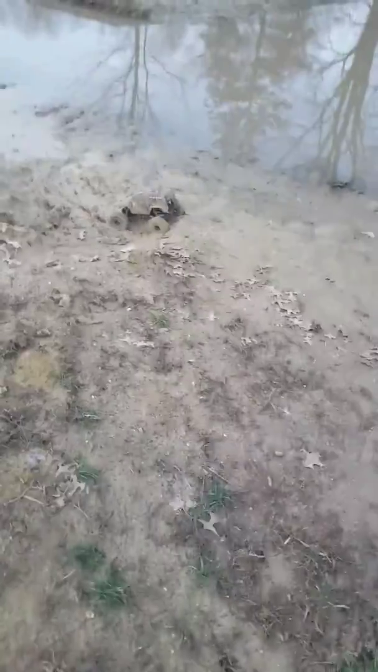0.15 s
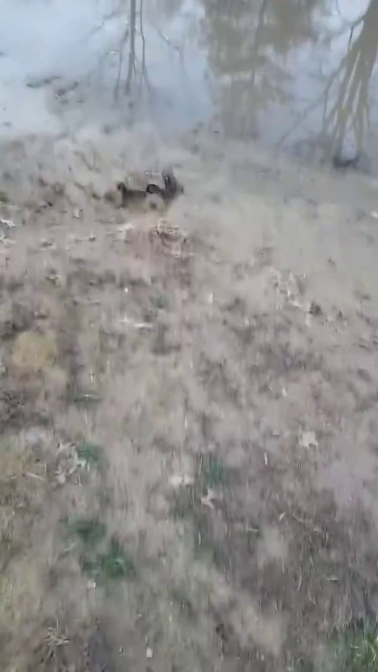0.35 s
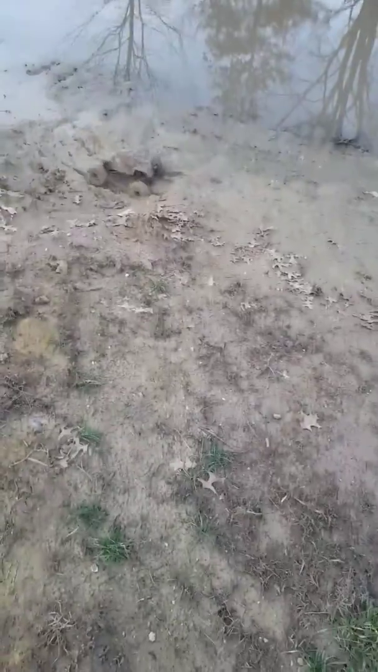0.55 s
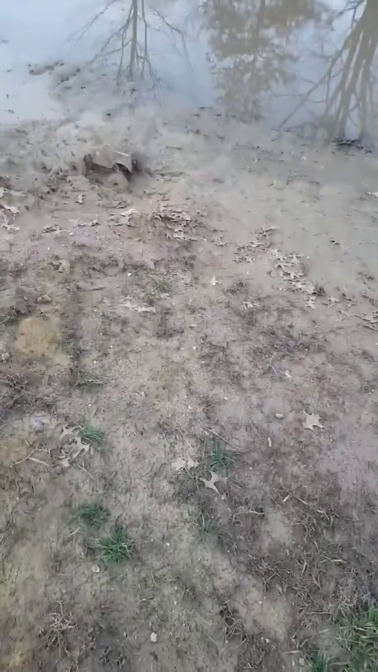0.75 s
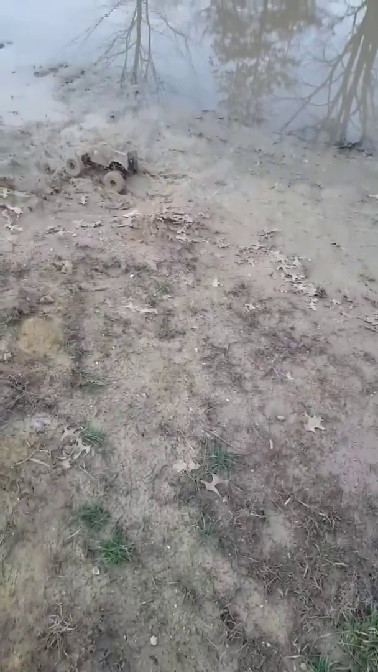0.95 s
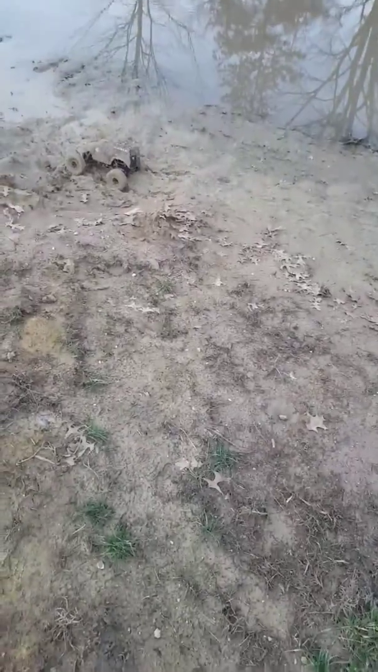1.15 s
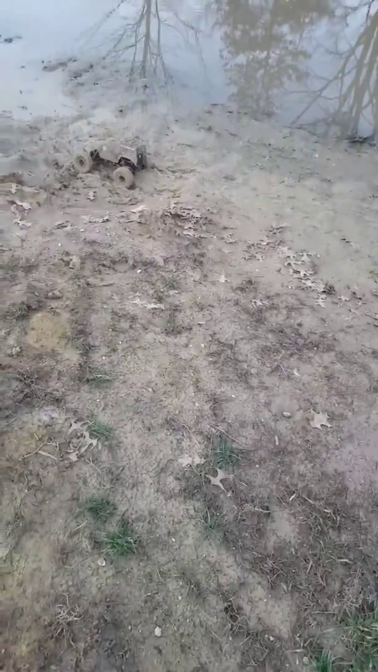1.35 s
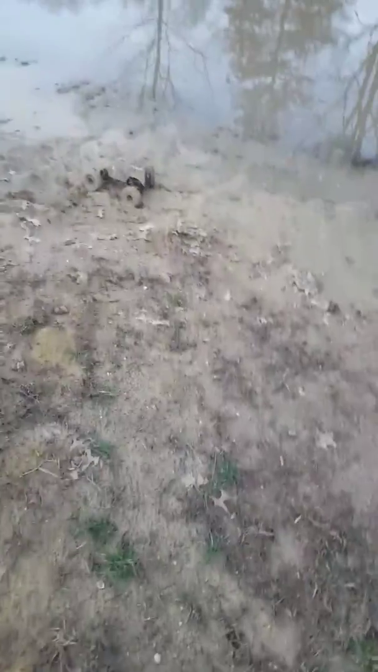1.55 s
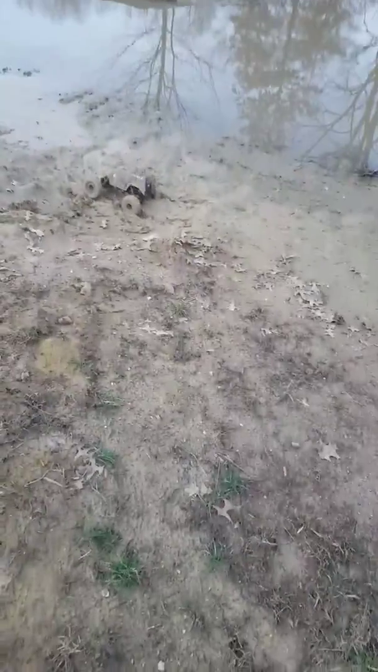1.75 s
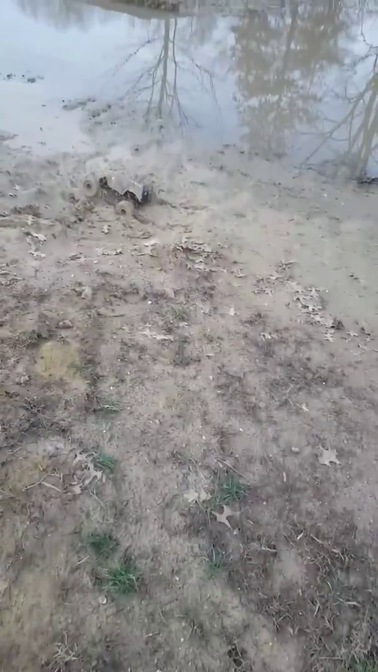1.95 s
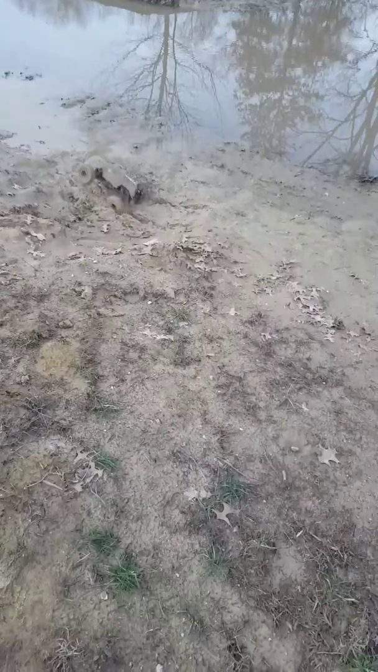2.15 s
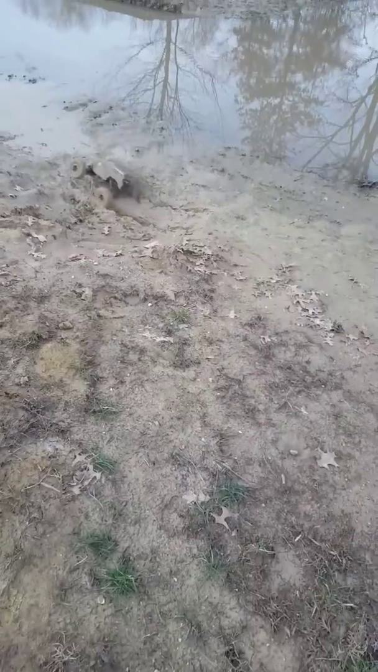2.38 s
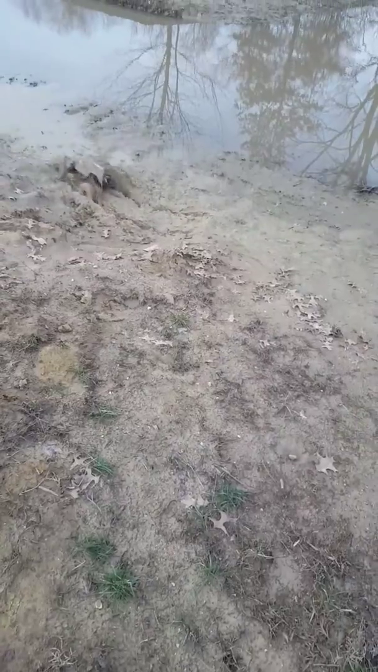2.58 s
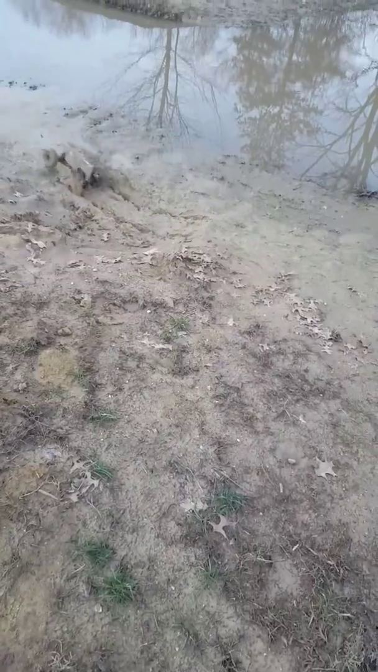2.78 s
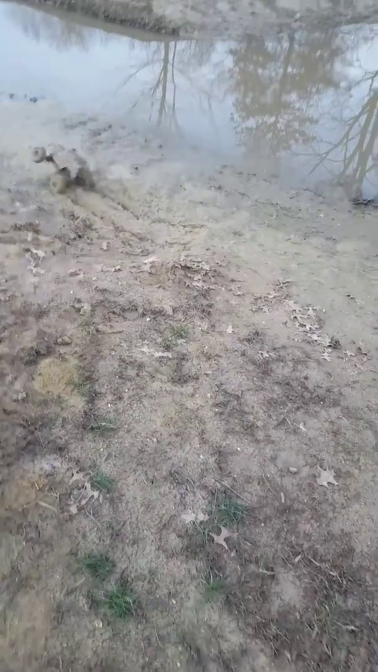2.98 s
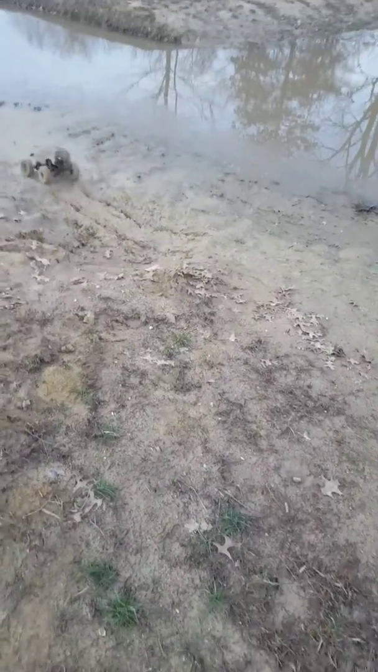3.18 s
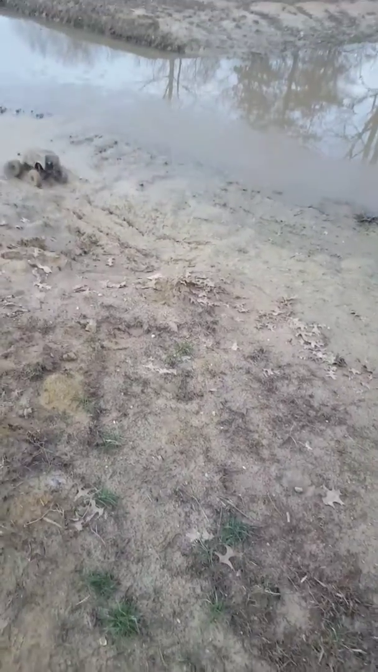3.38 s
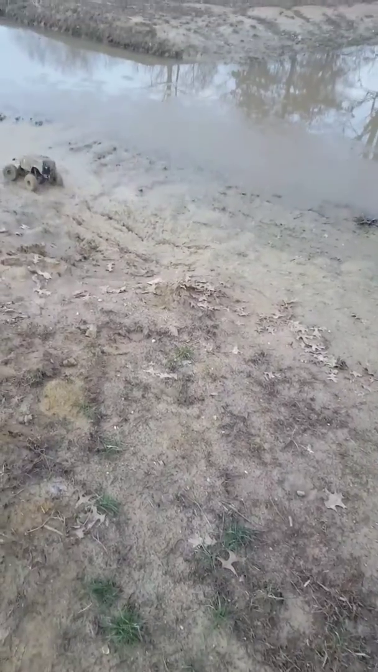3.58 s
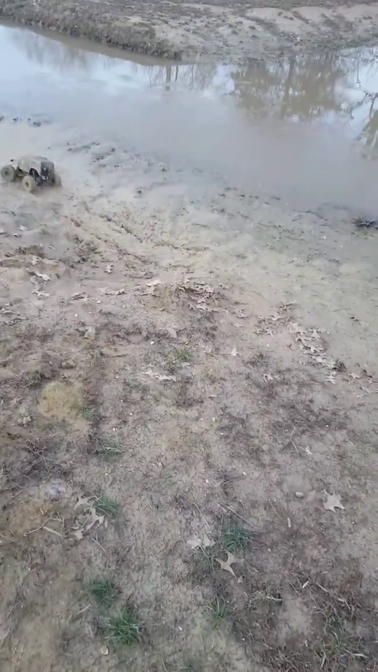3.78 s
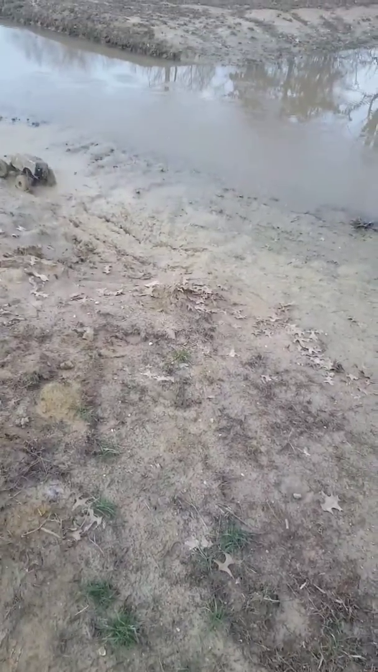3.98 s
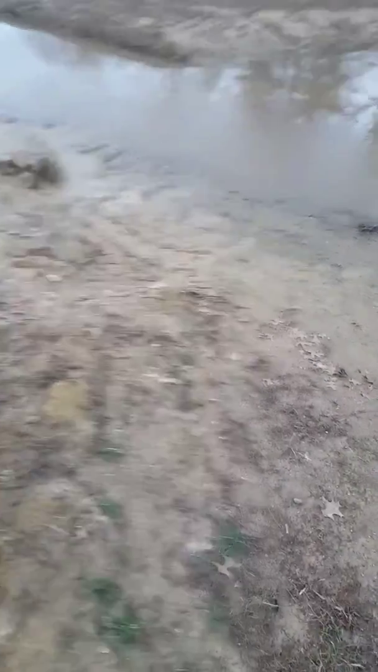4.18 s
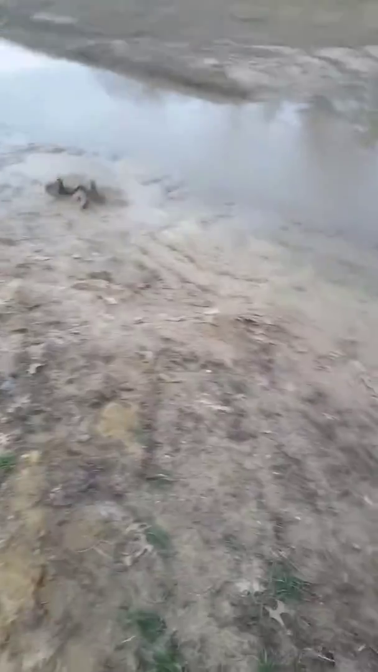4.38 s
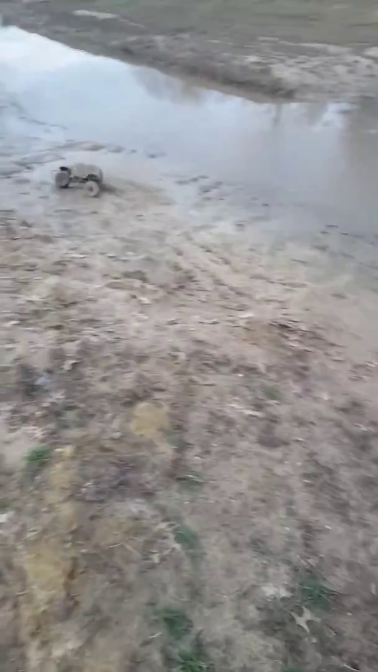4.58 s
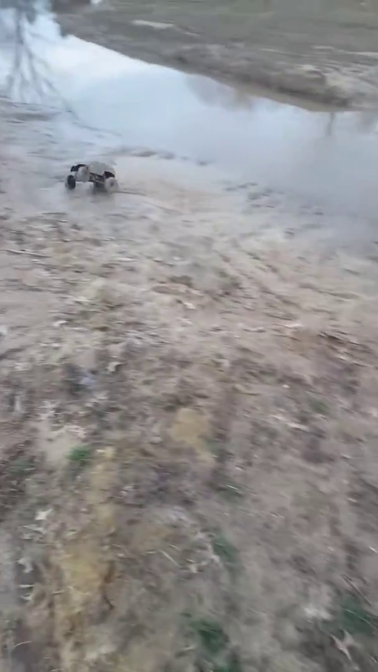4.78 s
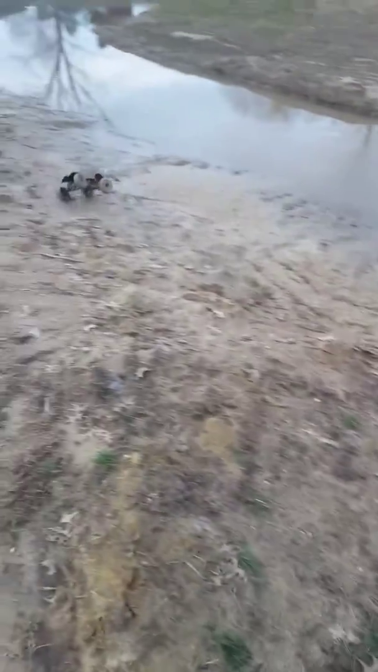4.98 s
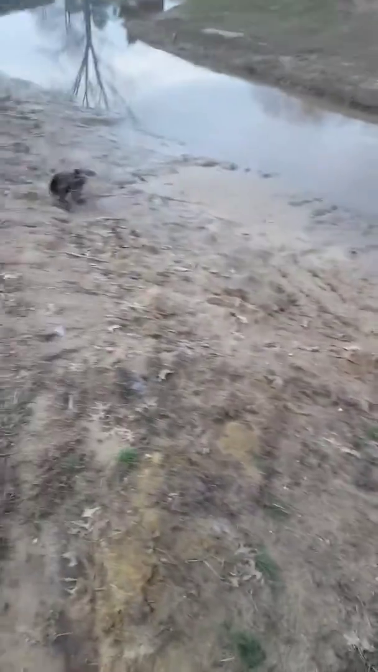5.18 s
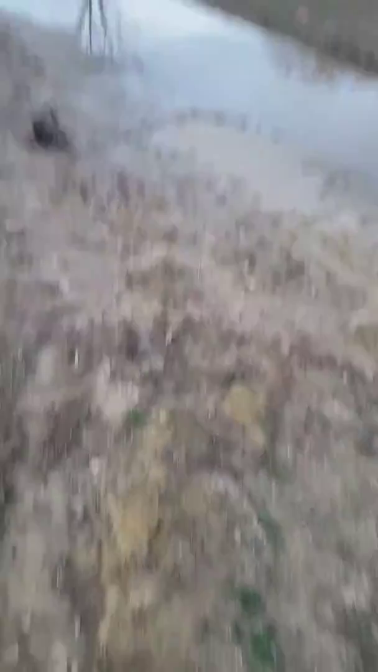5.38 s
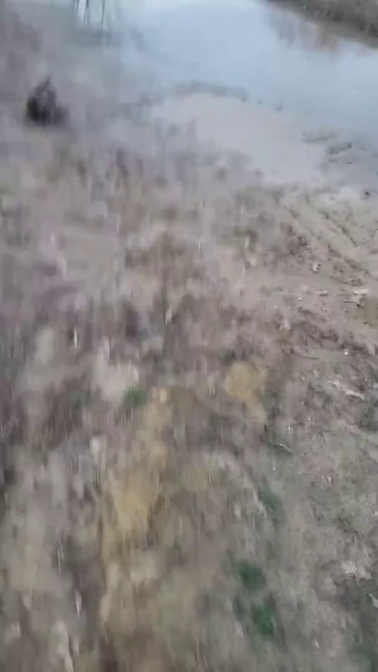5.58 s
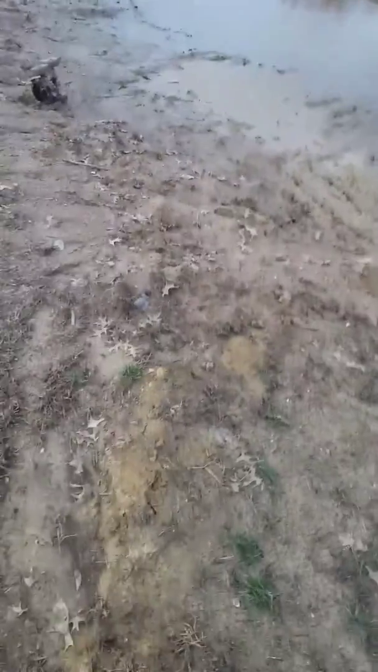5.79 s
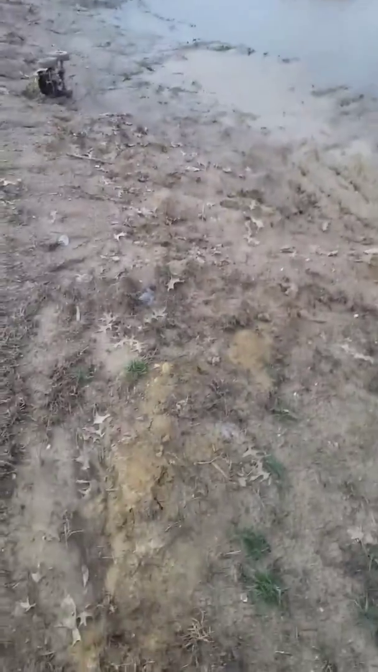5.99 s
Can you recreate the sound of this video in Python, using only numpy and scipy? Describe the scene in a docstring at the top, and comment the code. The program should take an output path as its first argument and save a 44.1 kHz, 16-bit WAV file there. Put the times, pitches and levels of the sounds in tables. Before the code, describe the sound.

Outdoors, a small electric truck snarls through mud in short and longer bursts, with splats, water patter and plops between and after them.

```python
"""At the muddy edge of a pond, in a light breeze, a radio-controlled truck works some metres off, ahead and left.
A first short burst of throttle snatches its gritty gears into a rattle and whine; then mud splats and drops fall.
The second burst is longer, with growls, shell booms and a patter of water; the third throws the most spray.
It bogs down and stops among last plops and bumps. Gears are noise and tones tied to motor speed, water is noise
and damped tones, and a hand-held camera with two resonant microphone ports hears it all."""
import sys
import numpy as np
from scipy import signal
from scipy.fft import rfft, irfft, next_fast_len
from scipy.io import wavfile
from scipy.ndimage import uniform_filter1d

SR = 44100
rng = np.random.default_rng(int(sys.argv[2]) if len(sys.argv) > 2 else 0)


def store_wav(level_fs):
    """Save 16-bit WAV to argv[1]."""
    pcm = np.round(np.clip(np.atleast_2d(level_fs), -1, 1) * 32767)
    wavfile.write(sys.argv[1], SR, pcm.T.astype(np.int16))


N = 266319
T = np.arange(N) / SR
PADDED = next_fast_len(N, True)
HZ = np.fft.rfftfreq(PADDED, 1 / SR)

# Levels in all tables are relative: other gains may act on them. Spectra give the level per Hz of noise.
# motor speed as the pitch of the gear whine, one list a burst of throttle: time_s, pitch_hz
MOTOR_SPEEDS = [
    [(.262, 199.6), (.46, 481), (.55, 980), (.6, 1450), (.63, 1704), (.665, 1890), (.71, 1700),
     (.745, 1250), (.79, 855), (.825, 820), (.852, 950), (.9, 330), (.95, 49)],
    [(1.478, 165), (1.66, 310), (1.69, 444), (1.89, 680), (1.96, 969), (2.005, 1740), (2.04, 1930),
     (2.1, 2146), (2.16, 2135), (2.225, 1788), (2.3, 2290), (2.38, 2576), (2.46, 2387), (2.525, 1738),
     (2.575, 1560), (2.665, 1520), (2.695, 1750), (2.74, 2110), (2.82, 1789), (2.89, 2077), (2.97, 2260),
     (3.03, 1800), (3.1, 1620), (3.15, 1317), (3.21, 630), (3.42, 312), (3.6, 122), (3.78, 60.3)],
    [(3.79, 202.7), (3.9, 476.5), (3.96, 855), (4, 1152), (4.12, 1683), (4.18, 1630), (4.24, 1412),
     (4.29, 1780), (4.355, 1910), (4.39, 1671), (4.44, 1540), (4.48, 1375), (4.55, 1365), (4.65, 1523),
     (4.77, 1659), (4.85, 1521), (4.9, 1899), (4.935, 2061), (4.97, 1830), (5.015, 2123), (5.1, 1788),
     (5.16, 1907), (5.2, 1270), (5.31, 1016), (5.355, 111), (5.6, 39.3)],
]
# how hard each burst works the truck:
# rattle_db, whine_db (against the rattle), mud_db, spray_db, drift_db_per_s (of all four)
BURST_LEVELS = [(-32.5, -3, -39.5, -52, -4), (-32, -7.5, -40.5, -44, -2), (-35, 0.5, -40.5, -27.5, -1)]
# the gears snatch as the tyres grip: start_s, peak_db, decay_s
GEAR_JOLTS = [(0.267, -35, 0.0025), (0.284, -32, 0.0076), (.308, -36, 0.0046), (0.337, -35, 0.0035),
              (.361, -55, 0.003), (0.383, -27.5, 0.0051), (0.417, -28, 0.0031), (0.426, -24.5, 0.0053),
              (.456, -41, 0.0037), (0.472, -32, 0.0084), (0.501, -22.5, 0.013), (0.53, -30.5, 0.03),
              (.55, -27, 0.0065), (.601, -29, 0.0035), (.618, -27, 0.0055), (0.638, -23, 0.0061),
              (.661, -29.5, 0.027), (.776, -21, 0.0056), (0.791, -21, 0.032), (0.824, -28, 0.027),
              (.88, -38, 0.0047), (1.477, -37.5, 0.0011), (1.493, -50, 0.0017), (1.521, -36, 0.0034),
              (1.677, -53, 0.0032), (1.745, -24.5, 0.007), (1.766, -26, 0.0056), (1.793, -25.5, 0.0069),
              (1.818, -32, 0.0037), (1.85, -25, 0.0036), (1.867, -24.5, 0.022), (1.946, -23.5, 0.012),
              (2.004, -28, 0.013), (3.037, -44, 0.0019), (3.154, -25, 0.0048), (3.793, -38, 0.0059),
              (3.841, -32, 0.0041), (3.98, -31, 0.0035), (4.108, -43, 0.0082), (4.263, -29, 0.006),
              (4.683, -22, 0.01), (4.755, -25, 0.12), (4.949, -23, 0.012), (5.187, -49, 0.0026)]
# spectrum of the gear rattle: pitch_hz, level_db
RATTLE_SPECTRUM = [(100, -19), (400, -4.5), (1150, 9.5), (1420, 13), (1750, 7.5), (2600, 0), (4000, 4.5),
                   (5500, -1), (7500, 4.5), (11000, -9.5), (16000, 9)]
# gearbox resonances: pitch_hz, width_hz, level_db
GEARBOX_MODES = [(434, 185, -6), (1651, 123, -4), (2090, 300, -4.5), (3240, 83, -13), (3580, 690, -6)]
# how strongly the gears sing: time_s, level_db
SINGING_LEVEL = [(.6, -9), (.68, 1), (2, -6), (2.05, 4.5), (2.18, 6), (2.27, 1.5), (2.45, -26), (2.54, 9),
                 (2.62, -3), (2.74, 3.5), (2.85, -2.5), (2.98, 5.5), (3.08, -8), (4.1, -0.5), (4.26, -2),
                 (4.33, -7), (4.39, 8.5), (4.46, -3), (4.6, 2), (4.77, -4.5), (4.85, -4), (4.92, -2),
                 (5.03, -6), (5.2, -13)]
# partials of the whine besides the mesh tone: multiple, width_hz, first_db, second_db, third_db (by burst)
WHINE_PARTIALS = [(.245, 30, -21, -15, -18.5), (.48, 40, -24, -15, -21), (.78, 50, -19.5, -13, -26),
                  (1.5, 110, -16, -21, -14), (2, 420, -13, -14, -13), (3, 450, -16, -37, -28),
                  (4.04, 553, -7.5, -10.5, -12)]
# how strongly the spur gear sings under the mesh tone: time_s, level_db
SPUR_LEVEL = [(3.85, -69), (4.13, -51), (4.22, -38), (4.28, -43), (4.38, -37.5), (4.43, -43), (4.48, -29.5),
              (4.53, -28.5), (4.555, -44), (4.6, -32), (4.65, -42), (4.76, -37), (4.85, -40), (4.9, -43),
              (5.05, -51), (5.3, -58)]
# body shell modes, drummed at high speed: pitch_hz, width_hz, level_db, onset_hz (motor speed)
SHELL_MODES = [(810, 103, -37.5, 2156), (1180, 46, -38.5, 2270)]
# squeaks of shell and gearbox: start_s, length_s, pitch_hz, width_hz, level_db, follows (motor pitch, 0-1)
SHELL_SQUEAKS = [(0.29, .12, 1686, 70, -48, 0.01), (0.471, 0.048, 1670, 70, -34.5, 0.1),
                 (.545, 0.0896, 1706, 60, -44, 0), (0.631, 0.075, 7500, 200, -45, 1),
                 (.65, 0.07, 1767, 90, -37, 0.05), (0.774, 0.099, 3370, 400, -40.5, 0.7),
                 (.63, 0.12, 3505, 500, -41, 0), (1.87, 0.026, 1780, 84, -34.5, 0.12),
                 (1.918, 0.048, 3905, 610, -33, 0.2), (2.42, 0.058, 1167, 50, -34, .1),
                 (2.507, 0.041, 3600, 120, -36.5, .2), (2.856, 0.046, 4020, 158.5, -42, .3),
                 (3.865, .04, 1700, 90, -47, .05), (3.925, .06, 3250, 450, -44, .4),
                 (4.455, .05, 1630, 60, -41, .1), (5.34, .1, 1970, 150, -64, 0),
                 (4.483, .1, 2026, 121, -43, 0.2), (4.843, 0.1, 3526, 300, -37.5, 0.4),
                 (5.279, 0.049, 2000, 140, -46, 0.06)]
# the chassis growls as the wheels spin free: start_s, length_s, level_db
CHASSIS_GROWLS = [(0.38, 0.096, -54), (.58, .2, -48), (2.022, 0.19, -42.5), (2.259, 0.091, -35.5),
                  (2.337, 0.17, -41.5), (2.712, 0.095, -42), (2.95, 0.056, -42), (3.04, .1, -52.5),
                  (4.92, 0.27, -50)]
# strands of the growl, pitched for full speed: pitch_hz, width_hz, level_db
GROWL_STRANDS = [(428, 12, -5), (482, 20.6, 1), (549, 16, -4.5)]
# spectrum of churned mud: pitch_hz, level_db
MUD_SPECTRUM = [(60, -25), (200, -1), (320, 0), (440, -1.5), (640, 1.5), (900, 8.5), (1300, 5), (2200, -2),
                (4000, -4), (7000, -18.5), (16000, -22)]
# the tyres shove a wave of wet mud aside: start_s, length_s, level_db
MUD_SLOSHES = [(0.408, 0.075, -45), (0.617, 0.21, -47), (1.27, 0.2, -64.5), (3.525, 0.13, -57),
               (3.779, 0.053, -51.5), (4.612, 0.23, -47.5), (5.395, .13, -60.5)]
# mud splats landing: start_s, peak_db
MUD_SPLATS = [(1.0645, -46), (1.0783, -39), (1.1134, -40.5), (1.161, -50), (1.181, -39.5), (1.2236, -46),
              (3.581, -46), (3.726, -41), (5.4308, -29), (5.4794, -41), (5.493, -44), (5.5235, -51),
              (5.5565, -44), (5.5713, -50)]
# spectrum of fine spray: pitch_hz, level_db
SPRAY_SPECTRUM = [(300, -7.5), (1500, 4), (3500, 1), (5500, -14), (7200, -2.5), (10000, -41), (13000, -5.5),
                  (16000, 9)]
# thrown water patters back on the pond: start_s, length_s, level_db
WATER_SHOWERS = [(1.305, 0.22, -69), (3.156, 0.29, -44.5), (3.4, 0.31, -54.5), (5.32, 0.17, -59)]
# spectrum of the patter: pitch_hz, level_db
PATTER_SPECTRUM = [(300, -14), (1200, 5), (2200, 6.5), (3600, 1), (5500, -8), (7200, -10.5), (15000, -18.5)]
# bubbles and drops in the puddles: start_s, peak_db, pitch_hz, t60_s
PUDDLE_PLOPS = [(.94, -45, 1190, .04), (1.064, -44, 1200, .014), (1.175, -52, 1750, .012),
                (1.238, -52, 2300, .015), (3.025, -31, 1490, .023), (3.027, -33, 2500, .012),
                (3.037, -40, 3870, .034), (3.268, -35, 1960, .015), (3.345, -40, 1450, .06),
                (3.413, -43, 1836, .05), (3.419, -38, 555, .06), (3.528, -43, 1260, .04),
                (3.545, -41, 625, .032), (3.55, -43, 1300, .025), (3.581, -36.5, 1260, .025),
                (3.582, -42, 1600, .015), (3.598, -40, 405, .014), (3.6, -42, 900, .012),
                (3.626, -45, 1050, .02), (3.665, -50, 820, .04), (3.698, -51, 780, .03),
                (3.718, -49, 870, .025), (3.733, -46, 1280, .012), (3.757, -50, 760, .02),
                (5.34, -35, 4270, .016), (5.341, -42, 1500, .015), (5.44, -47, 1200, .02),
                (5.514, -50, 780, .02), (5.5235, -32, 3400, .0035), (5.534, -48, 2850, .008),
                (5.5565, -33, 1900, .0014), (5.583, -52, 520, .02), (5.63, -53, 1450, .012),
                (5.657, -45.5, 1320, .007), (5.687, -53, 1220, .006), (5.716, -44.5, 1040, .007),
                (5.838, -55, 850, .015), (5.986, -43, 850, .003)]
# strength of the breeze on the ports: time_s, level_db
GUST_LEVEL = [(0, -57.5), (.75, -54), (1.1, -53.5), (1.24, -61.5), (1.4, -58), (1.51, -43.5), (2.03, -50.5),
              (2.9, -50), (3.06, -61), (3.25, -49), (3.72, -58), (3.95, -55), (5.1, -52.5), (5.4, -53.5),
              (5.65, -63), (6.04, -60.5)]
# spectrum of wind on the ports: pitch_hz, level_db
WIND_SPECTRUM = [(15, -62), (28, -28), (40, -8), (75, 1.5), (115, -2.5), (180, -8), (300, -21), (700, -51),
                 (3000, -81)]
# the hand shifts on the camera with a low rumble: start_s, length_s, pitch_hz, width_hz, level_db
HAND_RUBS = [(1.472, 0.22, 113, 99, -43), (1.779, 0.14, 103, 68.6, -39), (3.215, 0.41, 77.5, 55, -48)]
# soft bumps on the camera: start_s, peak_db, pitch_hz, t60_s
HAND_BUMPS = [(.235, -47, 88, 0.033), (1.6, -34, 184, 0.15), (3.286, -34, 92, 0.03), (5.735, -50, 75, .05),
              (5.758, -44.5, 186, 0.018), (5.958, -43, 115, 0.03)]
# spectrum of still outdoor air: pitch_hz, level_db
AIR_SPECTRUM = [(30, 15), (200, 6), (400, 6.5), (1000, 5.5), (1700, 0), (3000, -7.5), (6000, -15),
                (16000, -17.5)]
# response of the microphone ports: pitch_hz, left_db, right_db
PORT_RESPONSE = [(100, -4.5, -1), (530, -3.5, -3.5), (1044, -9.5, -8.5), (2263, -1, 4), (3490, -2.5, -1.5),
                 (4300, 1, -5.5), (4800, 0.5, 1.5), (6590, 10.5, -1.5), (7050, 18.5, 11), (7924, 9.5, 10.5),
                 (8750, -12.5, -6.5), (11370, 0, -1.5), (11200, 4.5, 5.5), (16100, -3, -4.5)]
# the truck between the ports: pitch_hz, left_lead_rad, likeness (0-1)
PORT_DIFFERENCE = [(145, -0.5, 0.89), (370, 1.5, 1), (690, 0.52, 0.96), (1040, 1.05, 1), (1570, 1.57, 0.95),
                   (1950, 1.45, 0.9), (2334, 3.5, 0.91), (2495, 3, 0.92), (3100, 4.5, 0), (4000, 6, 0.6),
                   (4600, 5, 0.5), (5420, 9.5, 0.53), (7120, 13, 0.65), (7940, 14, 0.25), (9740, 15, 0),
                   (14200, 21.5, .2)]


def truck(rattle_db=-1, ring_db=4.0, quieter_at_speed_db=12.0, coast_db=-4, jolt_db=-12, load_db=1.0,
          rough_db=1.5, uneven_db=.5, sing_wander_db=1, stall_hz=800, sing_from_hz=1426, sing_to_hz=2280,
          grit=0.51, flutter=0.01667, power=1.23):
    """Gritty teeth rattle and ring the gearbox, louder with speed and load; the whine rides on motor speed."""
    speed = motor_speed()
    winding_up = np.clip(uniform_filter1d(np.gradient(np.log(speed)) * SR, size=2000) / 4, 0, 1)
    # near stall the motor judders; at speed only a fine roughness is left
    stalled = 1 / (1 + (speed / stall_hz) ** 3)
    shake = amp(stalled * cogging() + rough_db * wander(130) + uneven_db * wander(22))
    jolts = sum(blows([(s, db)], rise=0.0025, decay=decay) for s, db, decay in GEAR_JOLTS)
    force = effort(power, axis=0) * amp(load_db * winding_up) * shake + amp(jolt_db) * jolts

    teeth = unit(noise() + grit * grains(per_s=1100)) * shaft_beat(speed)
    rattle = amp(rattle_db) * colour(teeth, RATTLE_SPECTRUM)
    # a slow, labouring motor knocks the box; a fast one sings instead
    box = sum(amp(db) * resonate(teeth, hz, width) for hz, width, db in GEARBOX_MODES)
    box = box * amp(ring_db - quieter_at_speed_db * (1.5 - stalled) + coast_db * coasting(speed))

    # backlash makes the mesh frequency flutter
    mesh_hz = speed * (1 + flutter * wander(75.9))
    in_range = 1 / (1 + (sing_from_hz / speed) ** 6 + (speed / sing_to_hz) ** 40)
    singing = in_range * amp(curve(SINGING_LEVEL) + sing_wander_db * wander(21))
    whine = effort(0, axis=1) * singing * gear_tone(mesh_hz)
    return force * (rattle + box + whine + overtones(mesh_hz))


def motor_speed():
    """The gear whine's pitch in Hz at every sample, joined up across the bursts."""
    return curve(sum(MOTOR_SPEEDS, []))


def effort(power, axis, cruise_hz=1800):
    """Gain growing as a power of motor speed, scaled by one BURST_LEVELS column; zero away from bursts."""
    running = np.zeros(N)
    for rows, levels in zip(MOTOR_SPEEDS, BURST_LEVELS):
        start, end = rows[0][0], rows[-1][0]
        drift_db = levels[-1] * (T - (start + end) / 2)
        running += amp(levels[axis] + drift_db) * (T > start) * (T < end)
    return uniform_filter1d(running, size=300) * (motor_speed() / cruise_hz) ** power


def cogging(knock_hz=48, jitter=0.2, knock_share=0.26, knock_db=8.5, judder_db=2.8):
    """Level in dB of a motor near stall: it catches and knocks at an uneven rate."""
    turns = np.cumsum(knock_hz * (1 + jitter * wander(25))) / SR
    knocks = np.exp(-(turns % 1) / knock_share) - knock_share
    return knock_db * knocks + judder_db * wander(90)


def coasting(speed):
    """0 while the motor pulls, towards 1 while it runs down."""
    return np.clip(-uniform_filter1d(np.gradient(np.log(speed)) * SR, size=8000) / 3, 0, 1)


def shaft_beat(mesh_hz, gear_ratio=4.4, beat_db=-0.5, jitter=0.039):
    """Mud on the gears makes the rattle throb once a turn, unevenly."""
    turns = np.cumsum(mesh_hz / gear_ratio * (1 + jitter * wander(48.0))) / SR
    return unit(amp(beat_db * np.cos(2 * np.pi * turns)))


def gear_tone(mesh_hz):
    """The mesh tone: a firm core in a rough band, wavering as the teeth meet unevenly."""
    tone = rasp(mesh_hz, 35, firmness=1) + amp(-6) * rasp(mesh_hz, 200)
    waver_db = 2.4 * np.tanh(wander(110))
    return unit(tone * amp(waver_db))


def overtones(mesh_hz, from_hz=800, housing_hz=3850, housing_width_hz=600, housing_db=5, level_db=-3.5,
              fade_hz=7800):
    """Other gears join in as the motor speeds up, high ones in fits, flaring at the housing's resonance."""
    out = np.zeros((2, N))
    burst = np.searchsorted([rows[0][0] for rows in MOTOR_SPEEDS[1:]], T)
    for multiple, width, *burst_dbs in WHINE_PARTIALS:
        hz = multiple * mesh_hz
        flare_db = housing_db / (1 + ((hz - housing_hz) / housing_width_hz) ** 2)
        # the low partials are steadier than the high ones
        fits_db = min(2 + 3 * multiple, 5.5) * np.tanh(wander(45))
        gain = amp(level_db + np.array(burst_dbs)[burst] + flare_db + fits_db)
        out += gain * rasp(hz, width) / (1 + (hz / fade_hz) ** 8)
    return out / (1 + (from_hz / mesh_hz) ** 4)


def spur(ratio=.66, width_hz=95, waver_db=3):
    """The spur gear sings roughly, a fifth below the mesh tone, as the truck pulls through the last stretch."""
    pulling = (T > SPUR_LEVEL[0][0]) * (T < SPUR_LEVEL[-1][0])
    level = amp(curve(SPUR_LEVEL) + waver_db * np.tanh(wander(60))) * pulling
    return level * rasp(ratio * motor_speed(), width_hz, firmness=.25)


def shell(bend=0.37, top_hz=2350, steepness=22):
    """The loose body shell booms when the wheels spin hard and squeaks, its pitch pulled by the motor."""
    speed, out = motor_speed(), np.zeros((2, N))
    for hz, width, db, onset_hz in SHELL_MODES:
        drummed = 1 / (1 + (onset_hz / speed) ** steepness)
        out += amp(db) * drummed * resonate(noise(), hz * (speed / top_hz) ** bend, width)
    for start, length, hz, width, db, follows in SHELL_SQUEAKS:
        middle_speed = np.interp(start + length / 2, T, speed)
        pull = (speed / middle_speed) ** follows
        out += amp(db) * arch(start, length) * rasp(hz * pull, width)
    return out


def growl(top_hz=2330, bend=0.45):
    """Unbalanced muddy shafts shake the chassis in surges; the strands slide with the motor."""
    pull = (motor_speed() / top_hz) ** bend
    strands = sum(amp(db) * rasp(hz * pull, width, firmness=0.97) for hz, width, db in GROWL_STRANDS)
    return strands * sum(amp(db) * arch(s, length) for s, length, db in CHASSIS_GROWLS)


def mud(churn_db=1, lumps=0.35, patchy_db=2.5, splat_db=-9):
    """Tyres tear wet clods loose; some land as short splats."""
    wet = colour(noise() + lumps * grains(per_s=560), MUD_SPECTRUM)
    churn = churning() * amp(churn_db + patchy_db * wander(44)) * wet
    landing = amp(splat_db) * blows(MUD_SPLATS, rise=0.00021, decay=0.0011) + clods()
    # splat spectrum: pitch_hz, level_db
    splat = colour(noise(), [(500, -16.0), (3500, 13.5), (7000, 6), (15000, 6.0)])
    return churn + landing * splat


def churning(power=0.91, settle_s=0.12, settle_share=0.086, seep_db=-69):
    """How much the mud moves: it follows the wheels, sloshes, settles slowly and never quite stops seeping."""
    stirred = effort(power, axis=2)
    sloshes = sum(amp(db) * arch(s, length) for s, length, db in MUD_SLOSHES)
    settling = linger(stirred, settle_s)
    return (1 - settle_share) * stirred + settle_share * settling + sloshes + amp(seep_db)


def clods(per_s=45, clod_db=-2, range_db=16, airborne_s=0.081, decay_s=0.0019):
    """Envelope of small clods that the tyres fling up and that keep landing after the wheels slow."""
    size = amp(clod_db - range_db * rng.random(N)) * linger(effort(1, axis=2), airborne_s)
    landings = size * (rng.random(N) < per_s / SR)
    return signal.lfilter([1], [1, -np.exp(-1 / (decay_s * SR))], landings)


def gurgle(count=260, bubble_db=1, range_db=16, low_hz=400, high_hz=2600, ring_cycles=32):
    """Small bubbles burst in the wet mud, as loud as the churning that frees them."""
    when, size, pitch = rng.random((count, 3)).T
    s, hz = when * T[-1], low_hz * (high_hz / low_hz) ** pitch
    churn_db = 20 * np.log10(np.interp(s, T, abs(churning())))
    db = churn_db + bubble_db - range_db * size
    return plops(zip(s, db, hz, ring_cycles / hz), glide=0.3, cycles=15.0)


def spray(spray_db=-3, drops=0.55, power=1.37):
    """Droplets fly off the tyres, the more the faster they spin."""
    droplets = colour(noise() + drops * grains(per_s=810), SPRAY_SPECTRUM)
    return amp(spray_db) * effort(power, axis=3) * droplets


def patter(drops=0.79):
    """Sheets of thrown water come down as many small drops."""
    falling = sum(amp(db) * arch(s, length) for s, length, db in WATER_SHOWERS)
    return falling * colour(noise() + drops * grains(per_s=600), PATTER_SPECTRUM)


def plops(rows, glide, cycles):
    """Damped tones that swell over a few cycles; a bubble's pitch climbs (glide) as it nears the surface."""
    t, out = T[:SR // 5], np.zeros((2, N))
    for s, db, hz, t60 in rows:
        turns = hz * (t + glide * t ** 2 / (2 * t60))
        shape = (1 - np.exp(-t * hz / cycles)) * amp(-60 * t / t60)
        add(out, s, amp(db) * shape / shape.max() * np.sin(2 * np.pi * turns))
    return out


def breeze(lumpy_db=3.0, shared=0.85, left_db=2.5):
    """Lumpy eddies, only partly shared by the two ports, and the rubs and bumps of the hand."""
    eddies = colour(noise() + shared * rng.standard_normal(N), WIND_SPECTRUM)
    eddies = eddies * amp([[left_db], [-left_db]])
    gusts = amp(curve(GUST_LEVEL) + lumpy_db * wander(30.0))
    rubs = sum(amp(db) * arch(s, length) * resonate(noise(), hz, width)
               for s, length, hz, width, db in HAND_RUBS)
    return gusts * eddies + rubs + plops(HAND_BUMPS, glide=0, cycles=1.0)


def still_air(level_db=-62.5):
    """Steady outdoor air: coloured noise, unrelated at the two ports."""
    return amp(level_db) * colour(noise(), AIR_SPECTRUM)


def amp(db):
    """Gain for a level in dB."""
    return 10 ** (np.asarray(db) / 20)


def unit(x):
    """Scales to rms 1."""
    return x / np.sqrt(np.mean(x ** 2) + 1e-20)


def curve(rows, axis=1):
    """One column of a time table, at every sample."""
    rows = np.array(rows)
    return np.interp(T, rows[:, 0], rows[:, axis])


def spectrum(rows, axis=1):
    """One column of a frequency table, at every bin."""
    rows = np.array(rows)
    return np.interp(np.log(HZ + 1), np.log(rows[:, 0] + 1), rows[:, axis])


def filtered(x, gain):
    """Applies one gain for each frequency bin."""
    return irfft(rfft(x, PADDED) * gain, PADDED)[..., :N]


def colour(x, rows):
    """Filters by a spectrum, to rms 1."""
    return unit(filtered(x, amp(spectrum(rows))))


def noise():
    """Two unrelated white noises."""
    return rng.standard_normal((2, N))


def wander(hz):
    """Slow chance of rms 1, up to about hz."""
    return unit(filtered(rng.standard_normal(N), 1 / (1 + (HZ / hz) ** 4)))


def grains(per_s):
    """Random clicks of uneven size."""
    return unit((rng.random(N) < per_s / SR) * noise())


def resonate(x, hz, width):
    """A two-stage resonance that follows hz, to rms 1."""
    turn = np.exp(2j * np.pi * np.cumsum(hz * np.ones(N)) / SR)
    r = np.exp(-np.pi * width / SR)
    # shift hz down to zero, low-pass, and shift back up
    band = signal.lfilter([(1 - r) ** 2], [1, -2 * r, r * r], x / turn)
    return unit((turn * band).real)


def rasp(hz, width, firmness=0.16):
    """A firm but unsteady tone: a band of noise around hz with its swells and gaps evened out."""
    r = np.exp(-np.pi * width / SR)
    band = signal.lfilter([1], [1, -2 * r, r * r], noise() + 1j * noise())
    band = band / (unit(abs(band)) + 0.15) ** firmness
    return unit((band * np.exp(2j * np.pi * np.cumsum(hz) / SR)).real)


def add(mix, s, sound):
    """Mixes a sound in at time s."""
    part = mix[..., round(s * SR):][..., :len(sound)]
    part += sound[:part.shape[-1]]


def blows(rows, rise, decay):
    """Envelope of a row of blows, each with a quick rise and a dying tail."""
    t, out = T[:SR // 8], np.zeros(N)
    shape = (1 - np.exp(-t / rise)) * np.exp(-t / decay)
    for s, db in rows:
        add(out, s, amp(db) * shape / shape.max())
    return out


def arch(start, length):
    """A rounded swell from 0 to 1 and back."""
    return np.sqrt(np.maximum(np.sin(np.pi * np.clip((T - start) / length, 0, 1)), 0))


def linger(gain, seconds):
    """Lets a gain trail behind its cause."""
    r = np.exp(-1 / (seconds * SR))
    return signal.lfilter([1 - r], [1, -r], gain)


def from_left(x):
    """Sound from ahead and to the left reaches the right port later, and less alike in the treble."""
    like = np.clip(spectrum(PORT_DIFFERENCE, axis=2), 0, 1)
    late = np.exp(-1j * spectrum(PORT_DIFFERENCE))
    right = filtered(x[0], like * late) + filtered(x[1], 1j * np.sqrt(1 - like ** 2) * late)
    return np.array([x[0], right])


def scene():
    """The truck and its mud ahead and to the left; breeze and air all around."""
    machine = truck() + spur() + shell() + growl()
    mud_and_water = mud() + gurgle() + spray() + patter() + plops(PUDDLE_PLOPS, glide=0.11, cycles=3.0)
    return from_left(machine + mud_and_water) + breeze() + still_air()


def record(dry, edge_hz=15950):
    """The camera's two microphone ports each ring near 7 kHz; then the band limit."""
    port_gains = amp([spectrum(PORT_RESPONSE, axis=1), spectrum(PORT_RESPONSE, axis=2)])
    heard = filtered(dry, port_gains)
    low_pass = signal.firwin(511, edge_hz, window=("kaiser", 9), fs=SR)
    return signal.oaconvolve(heard, low_pass[None], "same")


dry = scene()
out = record(dry)
store_wav(out)
```